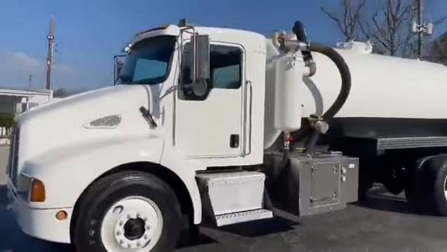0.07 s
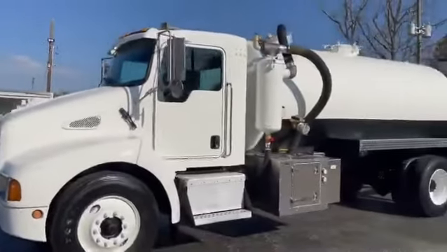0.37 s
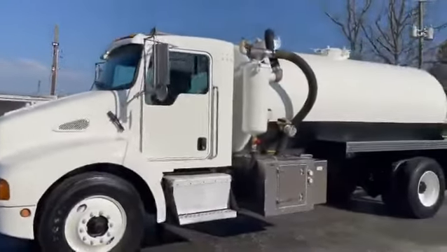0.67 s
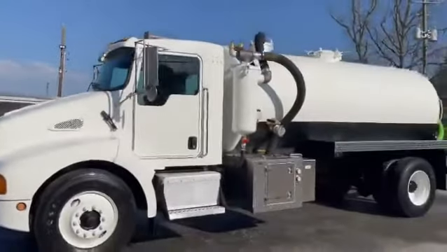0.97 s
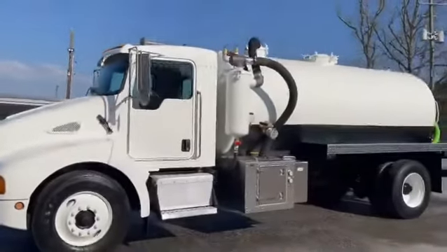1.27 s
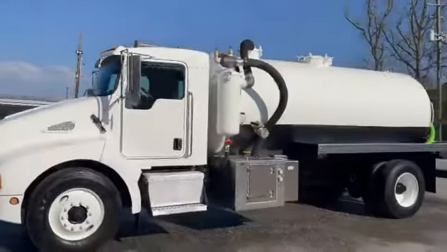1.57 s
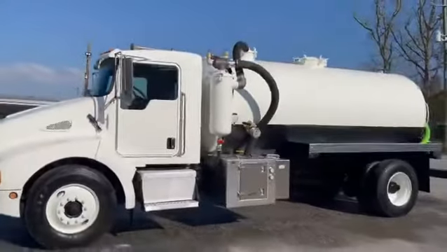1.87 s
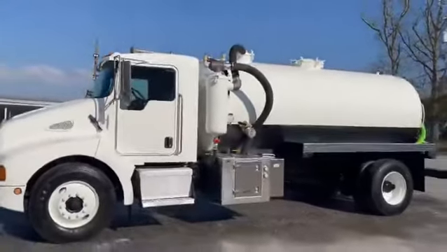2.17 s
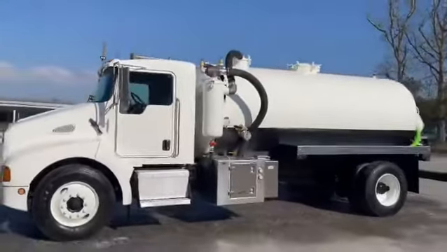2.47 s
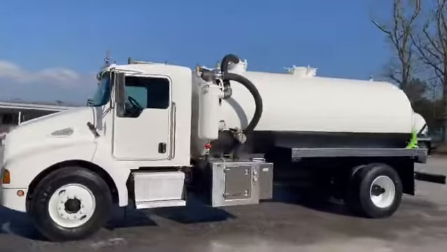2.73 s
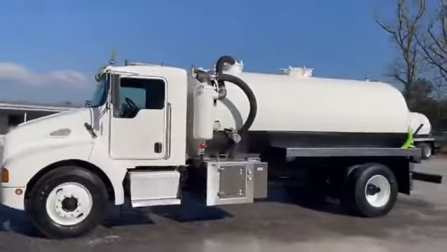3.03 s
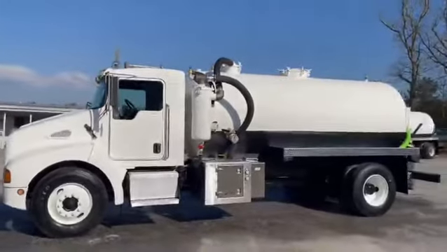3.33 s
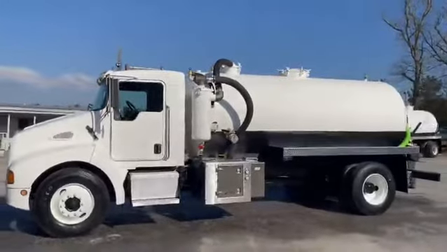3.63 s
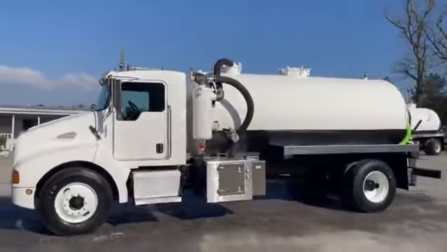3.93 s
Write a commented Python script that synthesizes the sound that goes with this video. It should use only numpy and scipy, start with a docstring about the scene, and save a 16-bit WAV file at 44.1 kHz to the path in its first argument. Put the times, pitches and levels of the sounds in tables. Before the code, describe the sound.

A parked vacuum truck's diesel engine and pump drone steadily, with a wavering whine.

```python
"""A parked vacuum truck on a paved lot. The listener backs slowly along it, so each tone swells and
fades on its own. From the start a six-cylinder diesel at fast idle drives a six-vane pump: the vanes
drone, the cylinders knock, the drive gears whine and flutter, air hisses. From 0.5 s a hollow boom
comes and goes. The hiss flares at 1.3 s, the whine peaks near 2.1 s, and the drone is loudest
from 3.2 s to the end at 4 s."""
import sys
import numpy as np
from scipy import signal
from scipy.fft import rfft, irfft, next_fast_len
from scipy.io import wavfile
from scipy.ndimage import uniform_filter1d, map_coordinates

SR = 44100
rng = np.random.default_rng(int(sys.argv[2]) if len(sys.argv) > 2 else 0)


def inscribe(sig):
    """Save sig as 16-bit PCM at rate SR to the path in sys.argv[1].

    A 1-D sig is mono; a 2-D sig holds one channel per row.
    Samples are clipped to [-1, 1] before scaling.
    """
    pcm = np.round(np.clip(np.atleast_2d(sig).T, -1, 1) * 32767)
    wavfile.write(sys.argv[1], SR, pcm.astype(np.int16))


N = 176400

FIRING_HZ, CYLINDERS = 49.806, 6
CYCLE_HZ = FIRING_HZ / CYLINDERS
SHAFT_HZ, VANES, GEAR_TEETH = 42.725, 6, 68
EARS = np.array([[.5], [-.5]])  # pan_db and lead_rad are left minus right

# knock strength per cylinder, in firing order: gain_db
CYLINDER_GAIN_DB = [0, -4, -12, 0, -1.5, -8]
# lean towards the cab: freq_hz, pan_db
CAB_PAN = [(200,5.5),(500,0.5),(1100,5.5),(2000,2.5),(4500,2),(8000,0)]


def amp(db):
    """Decibels to gain."""
    return 10 ** (np.asarray(db) / 20)


def unit(x):
    """Scale to rms 1."""
    return x / np.sqrt(np.mean(x ** 2) + 1e-20)


def seconds():
    """Time of every sample."""
    return np.arange(N) / SR


def along(points, hz):
    """Interpolate (freq_hz, value) rows on a log axis."""
    freq_hz, values = np.transpose(points)
    return np.interp(np.log(hz + 1), np.log(freq_hz + 1), values)


def curves(rows):
    """One per-sample curve for each column after time_s."""
    time_s, *columns = np.transpose(rows)
    return [np.interp(seconds(), time_s, column) for column in columns]


def wobble(rate_hz):
    """Smooth random curve with knots at rate_hz."""
    knots = rng.standard_normal(int(N * rate_hz / SR) + 4)
    return map_coordinates(knots, [seconds() * rate_hz], mode='mirror')


def filtered(x, response):
    """Apply a frequency response."""
    size = next_fast_len(N + SR // 2)
    return irfft(rfft(x, size) * response(np.fft.rfftfreq(size, 1 / SR)), size)[..., :N]


def bell(x, centre, sigma):
    """Gaussian of peak 1."""
    return np.exp(-.5 * ((x - centre) / sigma) ** 2)


def noise_band(centre_hz, sigma_hz):
    """Narrow noise of rms 1."""
    return unit(filtered(rng.standard_normal(N), lambda hz: bell(hz, centre_hz, sigma_hz)))


def pan(db):
    """Left and right gains."""
    return amp(EARS * db)


def tone(hz, clock_s, phase_rad=0):
    """Sine of rms 1 on a clock, random start phase."""
    return np.sqrt(2) * np.sin(2 * np.pi * (hz * clock_s + rng.random()) + phase_rad)


def spread(pair, colour):
    """Two unrelated noises to coloured stereo of rms 1, leaning towards the cab."""
    # left-right likeness: freq_hz, correlation
    likeness = [(70,1),(150,0.55),(300,.93),(600,0.43),(1000,0.5),(2000,0.32),(4000,0.72),(9000,0.7)]
    # left ear's phase lead: freq_hz, lead_rad
    ear_lead = [(100,0.097),(520,0.14),(1290,0.45),(1900,0.26),(2300,0.62),(3000,1),(4100,0.35),(5000,.4),(6000,.05),(9000,.05)]

    def mid_side_gains(hz):
        angle_rad = np.arccos(np.clip(along(likeness, hz), -1, 1)) / 2
        return amp(along(colour, hz)) * [np.cos(angle_rad), np.sin(angle_rad)]

    mid, side = filtered(pair, mid_side_gains)
    placement = lambda hz: pan(along(CAB_PAN, hz)) * np.exp(1j * EARS * along(ear_lead, hz))
    return unit(filtered(np.array([mid + side, mid - side]), placement))


def wavering(hz, clock_s, level_db, pan_db):
    """Tone whose level wavers, a little differently at each ear."""
    waver_db = 2 * wobble(4.17) + np.array([wobble(2.2), wobble(1.8)])
    return amp(level_db + waver_db) * pan(pan_db) * tone(hz, clock_s)


def vane_drone(clock_s):
    """The vanes chop the air into a clean drone of three harmonics."""
    # harmonics 1 to 3: time_s, level_db
    first = [(0.05, -18), (0.7, -22), (1.62, -22), (2.13, -19), (2.17, -19.5), (3.24, -15), (3.95, -15.5)]
    second = [(0.05,-34),(.3,-36.5),(.9,-44),(1.4,-42),(2.31,-47),(2.57,-35),(3.95,-30)]
    third = [(0,-50),(1.3,-44),(1.6,-39.5),(1.8,-37),(1.87,-34.5),(2.35,-34),(2.7,-37),(4,-35)]
    # drone position: time_s, pan_db
    position = [(0,-.3),(.65,3.3),(1.1,1),(1.7,-1),(2.2,0),(2.65,-2.4),(3.3,-0.2),(4,0)]
    # added per harmonic: pan_db
    offsets_db = [-0.5, -1, 4]
    pan_db, = curves(position)
    drone, lead_rad = 0, .11
    for k, (levels, offset_db) in enumerate(zip([first, second, third], offsets_db), 1):
        harmonic = tone(k * VANES * SHAFT_HZ, clock_s, EARS * lead_rad)
        drone += amp(curves(levels)[0]) * pan(pan_db + offset_db) * harmonic
    return drone


def pump_overtones(clock_s):
    """Shaft harmonics: one sings, one is rough, one squeals thinly, the rest waver faintly."""
    # overtones before trim: time_s, level_db
    sing_levels = [(0.0, -49), (0.41, -34), (0.9, -35), (1.0, -48), (1.88, -43), (2.47, -36), (2.52, -43.5),
                   (3.42, -40), (4.0, -48)]
    rough_levels = [(0,-52),(.33,-42),(.65,-50),(4,-53)]
    squeal_levels = [(0,-62),(.8,-56),(1.05,-54.5),(1.3,-61),(1.55,-50),(1.75,-55),(2.1,-56),(2.8,-60),(3.45,-54.5),(4,-63)]
    # weak lines: shaft_order, level_db, pan_db
    lines = [(3,-41,0),(11,-53,0),(13,-47,0),(16,-47,2),(17,-52,2),(24,-47,3),(30,-50,3),(42,-51,2),(81,-58,0),(84,-60,0),(85,-61,0)]
    sing_hz, rough_hz, squeal_hz = 44 * SHAFT_HZ, 51 * SHAFT_HZ, 93 * SHAFT_HZ
    sing_trim_db, squeal_trim_db = -2, 4
    sing = amp(curves(sing_levels)[0] + sing_trim_db) * tone(sing_hz, clock_s)
    rough = unit(noise_band(rough_hz, sigma_hz=60) + .5 * tone(rough_hz, clock_s))
    rough *= amp(curves(rough_levels)[0])
    squeal = amp(curves(squeal_levels)[0] + squeal_trim_db) * tone(squeal_hz, clock_s)
    faint = sum(wavering(k * SHAFT_HZ, clock_s, db, pan_db) for k, db, pan_db in lines)
    return pan(db=4) * (sing + rough) + squeal + faint


def exhaust(clock_s):
    """Firing note and weaker lines of unequal cylinders; two overtones hum beside the cab."""
    # lines before rise and octave gain: cycle_order, level_db
    lines = [(6,-23.6),(8,-52),(9,-41.5),(12,-37.3),(18,-45),(21,-45),(40,-47)]
    # firing note's octave, loudest part way along the truck: time_s, gain_db
    octave_gain = [(0,-3),(.8,-1),(1.4,4),(2,5),(2.6,-4.5),(4,-0.5)]
    # humming overtones: cycle_order
    hum_orders = [46, 56]
    # their levels: time_s, lower_db, upper_db
    hum_levels = [(0,-52,-54),(.6,-57,-47),(1.1,-42.5,-44.5),(1.7,-41,-46),(2.7,-43.5,-56),(4,-45.5,-51.5)]
    rise_db_per_s = .93
    octave_db, = curves(octave_gain)
    note = sum(amp(db + octave_db * (k == 2 * CYLINDERS)) * tone(k * CYCLE_HZ, clock_s)
               for k, db in lines)
    hum = sum(amp(db) * tone(k * CYCLE_HZ, clock_s) for k, db in zip(hum_orders, curves(hum_levels)))
    return note * amp(rise_db_per_s * (clock_s - clock_s.mean())) + hum


def boom():
    """A hollow low note that wanders in pitch and comes and goes."""
    # swells before trim: time_s, level_db
    levels = [(0.0, -41), (0.57, -23.5), (0.93, -29.5), (1.06, -57), (1.1, -26.5), (1.61, -31.5),
              (1.88, -23), (2.04, -41), (2.29, -24.5), (2.33, -36), (2.53, -23), (2.91, -41), (2.97, -23.5),
              (3.12, -32), (3.74, -34.5), (3.81, -52), (3.87, -29.5), (4.0, -32)]
    start_hz, sag_hz_per_s, wander_rad, trim_db = 140.3, 2, .5, -.8
    t = seconds()
    note = tone(start_hz - sag_hz_per_s * t / 2, t, wander_rad * wobble(6.5))
    return amp(curves(levels)[0] + trim_db) * note


def clatter(clock_s):
    """Each cylinder knocks with its own rattle, partly alike in every cycle and partly new."""
    # clatter before trim and band gains: time_s, level_db
    levels = [(0.1, -34.5), (1.19, -34), (3.85, -36.5)]
    # spectrum: freq_hz, relative_db
    colour = [(30,-41.5),(150,-4.5),(300,0.5),(450,-2.5),(580,0),(675,-1),(760,-0.5),(850,-3),(1000,2),(1170,1.5),(1370,-6),(1580,-0.5),(1750,-2.5),(1950,-3.5),(2350,-3.5),(2650,-10.5),(3300,-13.5),(6000,-22.5),(11000,-46)]
    # part alike in every cycle: freq_hz, power_share
    repeats = [(200,0.4),(600,0.78),(1100,0.86),(1600,0.23),(2500,0.32),(5000,0.086)]
    # midrange, changing with the listener's place: time_s, gain_db
    mid_gain = [(0,-1.5),(.9,0.5),(1.9,1.5),(2.5,-2.5),(4,-0.5)]
    decay_s, floor, unevenness, trim_db = .019, .6, .3, 4.5
    low_hz, low_rise_db_per_s, mid_hz, mid_sigma_hz = 755, .5, 1100, 88
    cycle_samples = SR / CYCLE_HZ
    cycle_noise = rng.standard_normal((2, int(cycle_samples) + 2))
    position = (clock_s * SR) % cycle_samples
    looped = np.array([map_coordinates(row, [position], mode='wrap') for row in cycle_noise])
    share = lambda hz: np.clip(along(repeats, hz), 0, 1)
    rattle = filtered(looped, lambda hz: np.sqrt(share(hz)))
    rattle += filtered(rng.standard_normal((2, N)), lambda hz: np.sqrt(1 - share(hz)))
    firings = clock_s * FIRING_HZ
    cylinder = np.floor(firings).astype(int) % CYLINDERS
    strength = amp(unevenness * np.take(CYLINDER_GAIN_DB, cylinder))
    knocks = floor + strength * np.exp(-(firings % 1) / FIRING_HZ / decay_s)
    sound = spread(rattle * knocks, colour)
    low = filtered(sound, lambda hz: 1 / (1 + (hz / low_hz) ** 6))  # opens up beside the chassis
    sound += low * (amp(low_rise_db_per_s * (clock_s - clock_s.mean())) - 1)
    mid = filtered(sound, lambda hz: bell(hz, mid_hz, mid_sigma_hz))
    sound += mid * (amp(curves(mid_gain)[0]) - 1)
    return amp(curves(levels)[0] + trim_db) * sound


def gear_whine(clock_s, engine_clock_s):
    """The mesh tone wavers once per shaft turn, throbs with the firings and rasps a little."""
    # mesh tone and first sidebands before trim: time_s, mesh_db, below_db, above_db
    levels = [(0,-35,-48,-50),(.17,-43,-39,-54),(.38,-49.5,-45,-50),(.55,-41.5,-53,-51),(.88,-38.5,-44,-42),(1.05,-44.5,-45,-46),
              (1.27,-48,-42,-43),(1.37,-48,-49,-51),(1.44,-35,-46,-41),(1.73,-38,-42,-48),(1.87,-36.5,-43,-38),(2.06,-30.5,-47,-46),
              (2.3,-38.5,-48,-48),(2.68,-45,-47,-46),(2.86,-39,-52,-41.5),(3.17,-48,-51.5,-43),(3.35,-44.5,-51,-41),(4,-45.5,-58,-38.5)]
    # sideband phase (near pi/2 the pitch wavers, near 0 the level flutters): time_s, phase_rad
    twist = [(0,1.3),(1.9,1.7),(2.6,0.93),(4,0.23)]
    # throb at the firing rate: time_s, depth
    throb_depth = [(1.5,.27),(3.4,.46)]
    mesh_jitter_rad, side_jitter_rad, lead_rad = .29, .28, 1.13
    extra_db, rasp_db, flicker_db, trim_db = -14, -9.5, .6, .5
    rasp_depth, lag_firings = .47, .6
    mesh_db, below_db, above_db = curves(levels)
    twist_rad, = curves(twist)

    def line(offset, db, phase_rad):
        return amp(db) * np.exp(1j * (2 * np.pi * (GEAR_TEETH + offset) * SHAFT_HZ * clock_s + phase_rad))

    whine = line(0, mesh_db, mesh_jitter_rad * wobble(30))
    sidebands = [(-.64, below_db + extra_db), (-1, below_db), (1, above_db), (2, above_db + extra_db)]
    for offset, db in sidebands:
        whine += line(offset, db, abs(offset) * twist_rad + side_jitter_rad * wobble(13))
    rasp = noise_band(centre_hz=2850, sigma_hz=51)
    rasp = unit(rasp * (1 + rasp_depth * np.cos(2 * np.pi * SHAFT_HZ * clock_s)))
    whine += amp(np.maximum(mesh_db, below_db) + rasp_db) * signal.hilbert(rasp) / np.sqrt(2)
    throb = 1 + curves(throb_depth)[0] * np.cos(2 * np.pi * (engine_clock_s * FIRING_HZ - lag_firings))
    stereo = np.sqrt(2) * np.real(whine * np.exp(1j * EARS * lead_rad))
    return amp(trim_db + flicker_db * wobble(20)) * throb * stereo


def block_ring(clock_s):
    """Every firing rings the engine block; the unequal cylinders make it lope."""
    # ring: time_s, level_db
    levels = [(0,-44),(1.8,-38),(4,-40)]
    ring_hz, t60_s, attack_s = 670.5, .05, .0027
    lag_s, scatter_s, scatter_db = .00503, .00017, 3
    firing = np.arange(int(clock_s[-1] * FIRING_HZ))
    cylinder = firing % CYLINDERS
    delay_s = rng.random(CYLINDERS) / ring_hz
    late, hard = rng.standard_normal((len(firing), 2)).T
    start_s = firing / FIRING_HZ + lag_s + delay_s[cylinder] + scatter_s * late
    strength = amp(np.take(CYLINDER_GAIN_DB, cylinder) + scatter_db * hard)
    blows = np.bincount(np.searchsorted(clock_s, start_s), strength, N)
    t = seconds()[:SR // 4]
    envelope = np.exp(-np.log(1000) * t / t60_s) * (1 - np.exp(-t / attack_s))
    ring = signal.fftconvolve(blows, envelope * np.sin(2 * np.pi * ring_hz * t))[:N]
    return amp(curves(levels)[0]) * pan(along(CAB_PAN, ring_hz)) * unit(ring)


def pump_rattle(clock_s):
    """A metal part of the pump rattles in a narrow resonance, once per shaft turn."""
    # rattle: time_s, level_db
    levels = [(0,-45),(1.3,-61),(2.05,-50),(2.25,-45),(2.45,-42),(2.6,-49),(3.05,-46),(4,-46)]
    ring = noise_band(centre_hz=1900, sigma_hz=70)
    bursts = 1 + .85 * np.cos(2 * np.pi * SHAFT_HZ * clock_s)
    return amp(curves(levels)[0]) * pan(db=4) * unit(ring * bursts)


def accessories(clock_s):
    """The engine's accessories add faint tones of steady pitch."""
    # tones: pitch_hz, level_db, pan_db
    lines = [(790,-46,2),(1579,-51,2),(2228,-56,2)]
    return sum(wavering(hz, clock_s, db, pan_db) for hz, db, pan_db in lines)


def turbulence():
    """Two white noises sharing time-frequency patches of 1 dB rms."""
    spectra = signal.stft(rng.standard_normal((2, N)), nperseg=512)[2]
    patches = uniform_filter1d(rng.standard_normal(spectra.shape[1:]), size=7, axis=0)
    patches_db = unit(uniform_filter1d(patches, size=14, axis=1))
    return signal.istft(spectra * amp(patches_db), nperseg=512)[1][:, :N]


def air(clock_s):
    """Fan and pump air hiss, pulsing with the engine and flaring once, over a low rumble."""
    # spectra: freq_hz, relative_db
    hiss_colour = [(300,-14),(1500,-3.5),(2500,-6.5),(2900,8.5),(3120,-6.5),(3550,-1.5),(4100,-6),(4350,5.5),(4550,4.5),(4800,-0.5),(5150,0),(5450,-5.5),(6050,-7.5),(6500,-6),(7300,-10),(9100,-9),(9800,-14.5),(10300,-29)]
    rumble_colour = [(10,-14),(30,-10.5),(50,-3.5),(100,0),(140,0),(180,-11),(300,-7),(600,-16.5),(2000,-55)]
    hiss_db, rumble_db, throb_depth, lope_depth = -39, -37.5, .08, .054
    flare_s, sigma_s, flare_hz, sigma_hz, flare_db = 1.32, .045, 4520, 130, 4.5
    firing_rad = 2 * np.pi * clock_s * FIRING_HZ
    lope = np.cos(firing_rad / CYLINDERS) + np.cos(firing_rad / 2)
    throb = 1 + throb_depth * np.cos(firing_rad) + lope_depth * lope
    hiss = amp(hiss_db) * throb * spread(turbulence(), hiss_colour)
    flare = amp(flare_db * bell(seconds(), flare_s, sigma_s)) - 1
    hiss += flare * filtered(hiss, lambda hz: bell(hz, flare_hz, sigma_hz))
    return hiss + amp(rumble_db) * spread(rng.standard_normal((2, N)), rumble_colour)


def scene():
    """Engine and pump run together, each on a slightly drifting clock."""
    engine_s = seconds() + 60e-6 * wobble(2.45)
    pump_s = seconds() + 50e-6 * wobble(4.05)
    engine = accessories(engine_s) + exhaust(engine_s) + clatter(engine_s) + block_ring(engine_s)
    pump = vane_drone(pump_s) + pump_overtones(pump_s) + pump_rattle(pump_s)
    return engine + pump + gear_whine(pump_s, engine_s) + air(engine_s) + boom()


def record(dry):
    """Brick-wall low-pass at 10.2 kHz."""
    return filtered(dry, lambda hz: hz < 10200)


dry = scene()
out = record(dry)
inscribe(out)
```